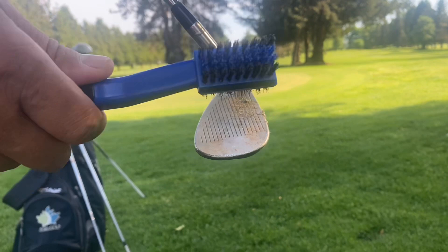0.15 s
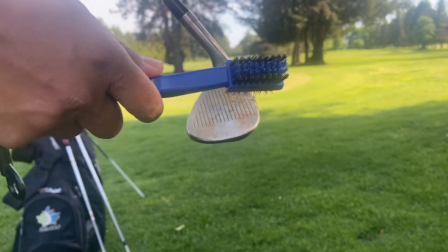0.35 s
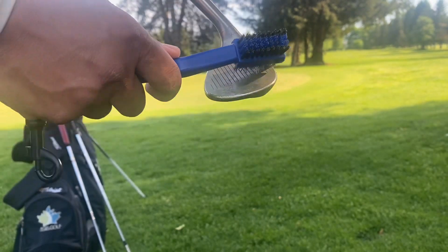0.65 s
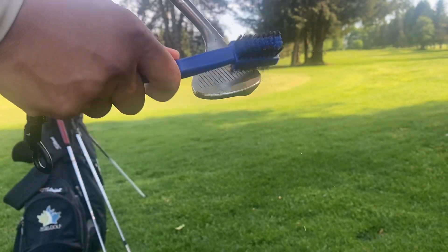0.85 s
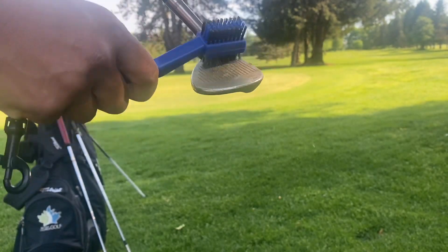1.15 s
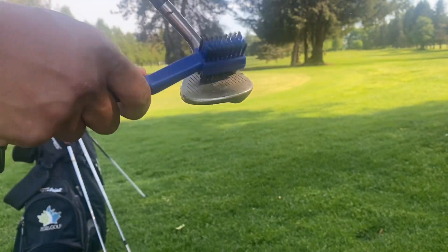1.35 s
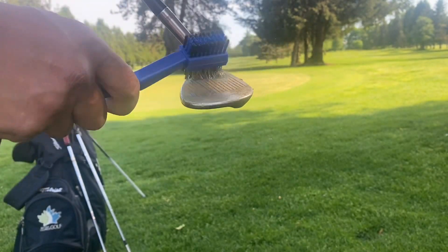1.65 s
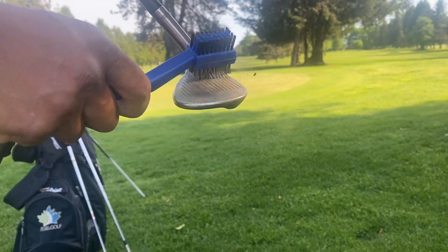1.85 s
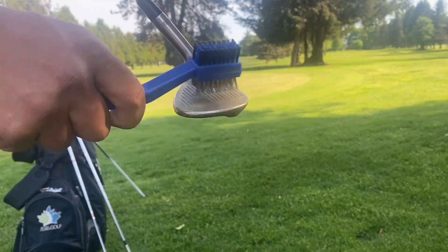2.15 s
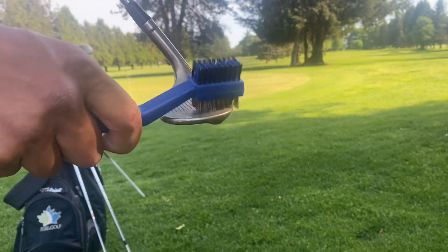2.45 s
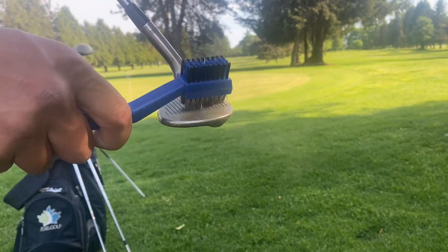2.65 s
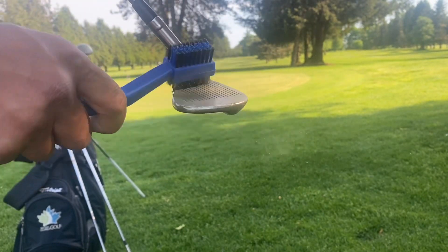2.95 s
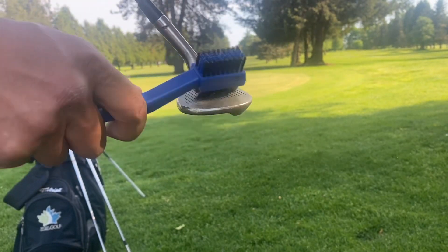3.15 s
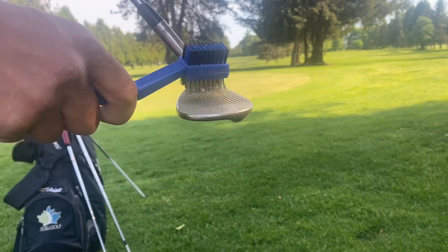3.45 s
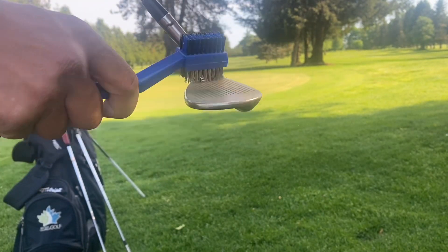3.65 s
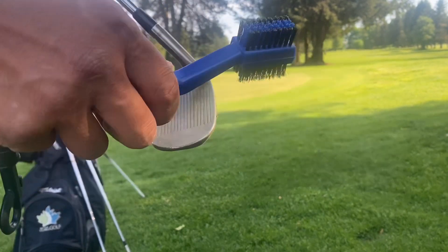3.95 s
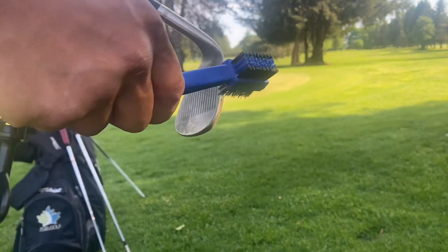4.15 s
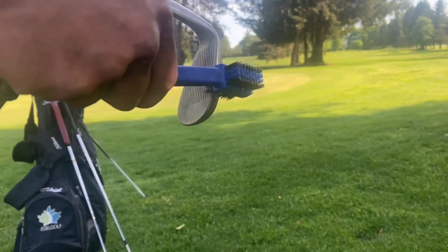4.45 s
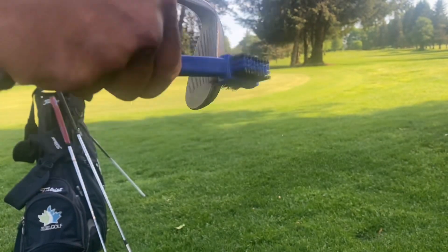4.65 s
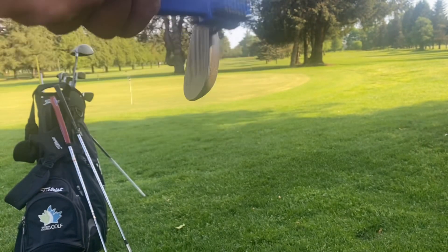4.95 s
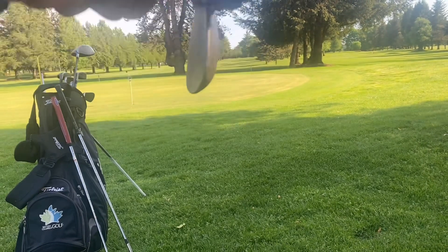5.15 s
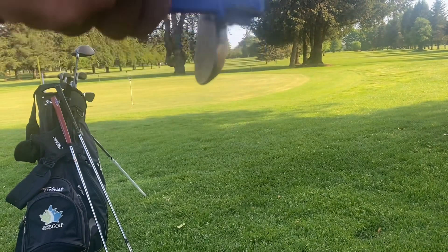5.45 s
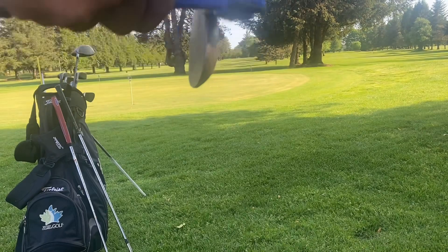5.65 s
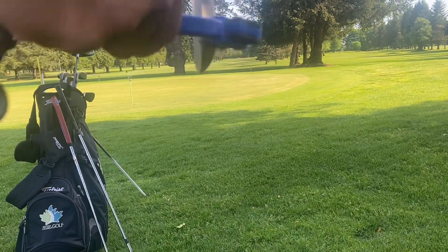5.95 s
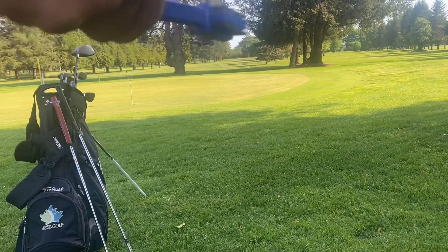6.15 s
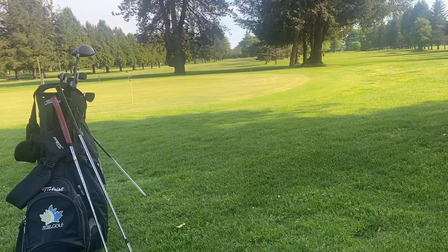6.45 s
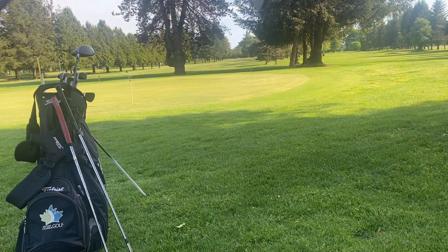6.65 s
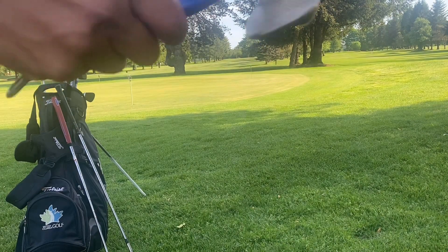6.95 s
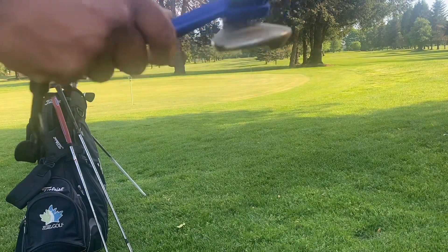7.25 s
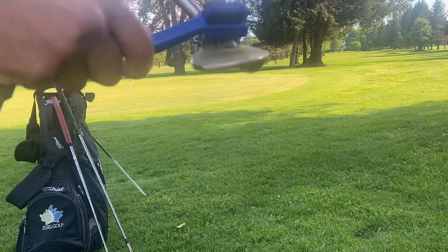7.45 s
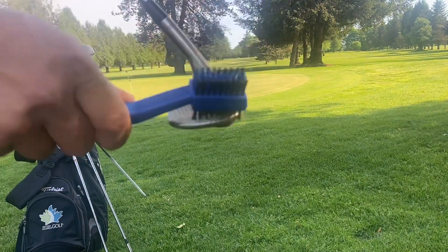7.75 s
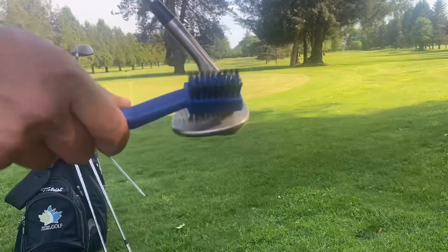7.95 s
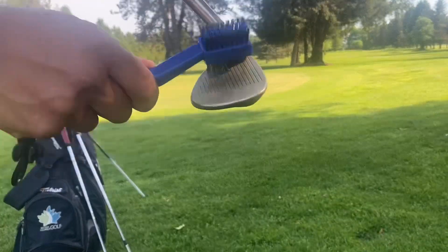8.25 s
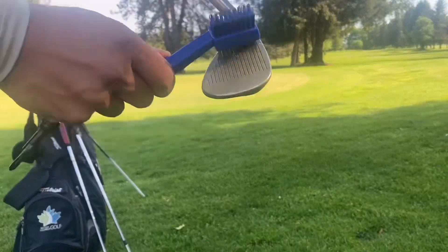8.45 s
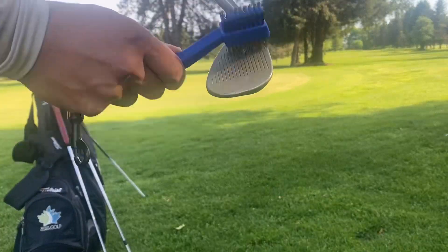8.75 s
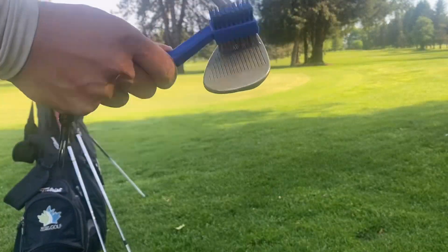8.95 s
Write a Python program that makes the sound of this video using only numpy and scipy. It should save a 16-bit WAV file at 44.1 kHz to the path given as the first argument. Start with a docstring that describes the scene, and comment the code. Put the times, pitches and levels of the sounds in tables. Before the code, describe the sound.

Very close, a stiff brush scrubs a grooved metal club face about ten strokes a second, raspy and hissy. It pauses briefly, resumes on another club with a slightly different colour, stops with a sharp plastic-on-metal knock, then after a light pass scrubs harder to the end. Outdoors on open grass, distant mowers rumble low and a bird whistles faintly early on. Near stereo microphone, dry, no echo.

```python
"""A stiff brush scrubs grooved golf clubs close by, about ten strokes a second: stick-slip clicks, coloured
by the club face and swelling with brush speed. Tufts flick off edges as short noise bursts; the plastic
head knocks on the metal, ringing damped modes; thin pings ring at single high pitches.
Far off, mowers rumble and drone (filtered noise, wavering sines) and a bird whistles gliding tones."""
import sys
import numpy as np
from scipy import signal
from scipy.fft import rfft, irfft, next_fast_len
from scipy.io import wavfile
from scipy.ndimage import uniform_filter1d

SR = 44100
rng = np.random.default_rng(int(sys.argv[2]) if len(sys.argv) > 2 else 0)


def unload_wav(signal):
    """Save mono or channel-first audio to the path in sys.argv[1] as 16-bit WAV at rate SR, clipped to [-1, 1]."""
    wavfile.write(
        sys.argv[1],
        SR,
        np.round(np.clip(np.atleast_2d(signal).T, -1, 1) * 32767).astype(np.int16),
    )


N = 400869
TIME = np.arange(N) / SR
SIZE = next_fast_len(N + 4096)
FREQS = np.maximum(np.arange(SIZE // 2 + 1) * SR / SIZE, 1)


def from_db(db):
    """Decibels to gain."""
    return 10 ** (np.asarray(db) / 20)


def rms_one(x):
    """Scale to unit power."""
    return x / np.sqrt(np.mean(x ** 2) + 1e-20)


def in_time(rows):
    """Each column of a curve, interpolated at every sample."""
    s, *columns = np.transpose(rows)
    return [np.interp(TIME, s, column) for column in columns]


def in_hz(points):
    """A table interpolated over log frequency at every bin."""
    hz, value = np.transpose(points)
    return np.interp(np.log(FREQS), np.log(hz), value)


def to_wave(spectrum):
    """Back from frequency to time."""
    return irfft(spectrum, SIZE)[..., :N]


def drift(rate_hz):
    """Random curve of rms 1 with a new target rate_hz times a second."""
    return rms_one(np.interp(TIME * rate_hz, np.arange(20000), rng.standard_normal(20000)))


def bandpass(x, low_hz, high_hz):
    """Butterworth band."""
    return signal.sosfilt(signal.butter(2, [low_hz, high_hz], "band", fs=SR, output="sos"), x)


def arch(start_s, length_s, power, skew=1):
    """The samples of one gesture, its progress 0-1, and its rise and fall."""
    first = max(round(start_s * SR), 0)
    last = min(round((start_s + length_s) * SR), N)
    span = np.arange(first, last)
    progress = np.clip((span / SR - start_s) / length_s, 0, 1)
    return span, progress, np.abs(np.sin(np.pi * progress ** skew)) ** power


def ring(force, hz, t60_s):
    """One damped mode: a unit click starts a decaying sine of initial height 1."""
    r = from_db(-60 / (t60_s * SR))
    w = 2 * np.pi * hz / SR
    return signal.lfilter([0, np.sin(w)], [1, -2 * r * np.cos(w), r * r], force)


RING_WANDER = .018  # rms share of the pitch


def sing(sound, curve, width_hz):
    """Adds a resonance that moves in pitch and strength: shift to 0 Hz, lowpass, shift back."""
    hz, strength_db = in_time(curve)
    hz = hz * (1 + RING_WANDER * drift(12))
    turn = np.exp(2j * np.pi * np.cumsum(hz) / SR)
    r = np.exp(-np.pi * width_hz / SR)
    baseband = signal.lfilter([1 - r], [1, -r], sound * turn.conj() + 1e-18)
    return sound + from_db(strength_db) * 2 * np.real(turn * baseband)


def pair(two, likeness):
    """Spectra of left and right, of given likeness, from two unrelated signals."""
    mid, side = rfft(two, SIZE)
    alike = np.clip(in_hz(likeness), -1, 1)
    return np.sqrt(1 + alike) * mid + np.sqrt(1 - alike) * side * [[1], [-1]]


# left over right port: (frequency [Hz], left minus right [dB])
PORT_BALANCE = [(300, 1.5), (1200, 2.5), (2500, 5.5), (3600, 4.5), (5000, 2.5), (6500, 1), (9000, 0),
                (15500, 0)]
# phase between the ports: (frequency [Hz], left lead [rad])
PORT_LEAD = [(6400, 0), (7300, -1.3), (8300, -3.0), (9600, -5.8), (10400, -6.3), (11800, -9.4),
             (12800, -9.8), (13200, -12), (14400, -12.6), (15400, -15.5)]


def at_ports(spectra):
    """A near source reaches the left microphone port louder, and its treble later."""
    gain = from_db(in_hz(PORT_BALANCE) * [[.5], [-.5]])
    return spectra * gain * np.exp(1j * in_hz(PORT_LEAD) * [[1], [0]])


# likeness of the ports for near noise: (frequency [Hz], likeness [0-1])
NEAR_LIKENESS = [(500, 0.24), (2400, 0.31), (4000, 0.65), (6500, 0.41), (8400, 0.95), (10000, 0.91),
                 (12000, 1), (13000, 0.73), (14000, 0.89), (15500, .88)]


def near_pair(two):
    """Port spectra of a near noise source."""
    return at_ports(pair(two, NEAR_LIKENESS))


# left-right likeness of far noise: (frequency [Hz], likeness [0-1])
FAR_LIKENESS = [(60, 1), (130, 0.93), (260, 0.66), (500, 0.033), (900, 0), (8000, 0.32)]


def background(colour):
    """Steady far noise of rms 1, most alike left and right in the bass."""
    noise = pair(rng.standard_normal((2, N)), FAR_LIKENESS)
    return rms_one(to_wave(noise * from_db(in_hz(colour))))


# spectrum of the open air: (frequency [Hz], relative density [dB per Hz])
AIR_SPECTRUM = [(30, -4.5), (100, 8.5), (200, 6), (280, -1.5), (400, -6), (700, -8), (1100, -11),
                (1600, -17.5), (2200, -21.5), (2900, -23.5), (3700, -33.5), (6000, -37), (9000, -55.5),
                (15500, -58.5)]


def open_air(level_db):
    """Steady broad noise, strongest in the bass."""
    return from_db(level_db) * background(AIR_SPECTRUM)


# distant machines draw nearer: (time [s], relative level [dB])
RUMBLE_LEVEL = [(0, -44.5), (1.8, -43), (3.2, -42), (6.5, -42), (9.09, -42.5)]
# spectrum of the rumble: (frequency [Hz], relative density [dB per Hz])
RUMBLE_SPECTRUM = [(18, -59), (27, -36), (36, -25.5), (50, -9), (66, 2.44), (85, 1.6), (100, -4.5),
                   (130, -4.5), (170, -16), (230, -20.5), (320, -36.5), (600, -75.5)]


def rumble(level_db):
    """Far machines as low noise, strongest near 70 Hz."""
    return from_db(in_time(RUMBLE_LEVEL)[0] + level_db) * background(RUMBLE_SPECTRUM)


def tone(hz, waver):
    """A far tone of rms 1, wavering in pitch and level as the air moves."""
    phase = 2 * np.pi * np.cumsum(hz * (1 + waver * drift(9))) / SR
    return rms_one(np.sin(phase) * (1 + .22 * drift(13)))


# deep drone of one mower: (time [s], relative level [dB])
DRONE_LEVEL = [(0, -58), (1.2, -56.5), (3.2, -41.5), (4.5, -47.5), (6.2, -40), (7.0, -47), (7.6, -39.5),
               (9.09, -55)]
DRONE_HZ = 66.25
# third engine, slowing and fading: (time [s], pitch [Hz], level [dB])
THIRD_ENGINE = [(0, 158.8, -54.5), (.5, 154.7, -50), (1.2, 117, -54.5), (2.6, 128.7, -53),
                (3.3, 125.7, -92)]
# second mower, sagging in speed: (time [s], fundamental [dB, relative], second harmonic [dB])
SECOND_MOWER = [(0, -59, -59), (1.6, -80, -63), (2.2, -58, -56), (5.6, -50, -57.5), (7.2, -56, -64.5),
                (8.3, -52, -54), (9.09, -52, -44.5)]
MOWER_HZ, MOWER_SAG_HZ_PER_S = 88.25, .43
# steady far hum, a little weaker later: (time [s], fundamental level [dB])
FAR_HUM = [(3, -64.5), (4, -70.5), (9.09, -69)]
HUM_HZ, HUM_OCTAVE_DB = 355.2, -12


def mowers(drone_db, mower_db, third_db):
    """Low engine orders carry across the grass as wavering sines."""
    out = from_db(in_time(DRONE_LEVEL)[0] + drone_db) * tone(DRONE_HZ, waver=0.0193)
    engine_hz, engine_db = in_time(THIRD_ENGINE)
    out += from_db(engine_db) * tone(engine_hz, waver=.06)
    hz = MOWER_HZ - MOWER_SAG_HZ_PER_S * TIME
    first_db, second_db = in_time(SECOND_MOWER)
    out += from_db(first_db + mower_db) * tone(hz, waver=.016)
    # third harmonic follows the second
    upper = tone(2 * hz, waver=0.0038) + from_db(third_db) * tone(3 * hz, waver=0.00485)
    out += from_db(second_db) * upper
    octave = from_db(HUM_OCTAVE_DB) * tone(2 * HUM_HZ, waver=0.0022)
    hum = tone(HUM_HZ, waver=0.0022) + octave
    return out + from_db(in_time(FAR_HUM)[0]) * hum


# whistles: (start [s], length [s], first pitch [Hz], last pitch [Hz], relative level [dB])
WHISTLES = [(0.659, .1, 1636, 1570, -73), (0.781, .23, 1877, 1830, -73), (1.129, .075, 1655, 1710, -70),
            (1.214, .075, 1700, 1622, -63.5), (1.291, 0.05, 1670, 1676, -67), (1.385, .09, 1688, 1634, -70),
            (1.635, 0.145, 1595, 1797, -68)]


def bird(level_db):
    """A few faint slurred whistles, fluttering on their way through the air."""
    hz = np.full(N, float(WHISTLES[0][2]))
    song = np.zeros(N)
    for start_s, length_s, first_hz, last_hz, note_db in WHISTLES:
        span, progress, swell = arch(start_s, length_s, power=0.4)
        hz[span] = first_hz + (last_hz - first_hz) * progress
        song[span] = from_db(note_db) * swell
    flutter = 1 + .45 * drift(60)
    return from_db(level_db) * song * flutter * tone(hz, waver=0.0055)


# from a stiff bristle or the brush clip: (time [s], pitch [Hz], relative peak [dB], t60 [s])
METAL_PINGS = [(3.8203, 13600, -26.5, 0.0074), (6.739, 9400, -59, 0.077), (6.769, 9500, -56.5, 0.047),
               (6.829, 9200, -57.5, 0.095), (7.062, 9400, -67, 0.072), (7.0894, 9460, -55, .06),
               (7.11, 9400, -66, 0.036)]


def pings(level_db):
    """Small steel parts are set ringing at one high pitch."""
    click = np.zeros(SR // 8)
    click[0] = 1
    out = np.zeros(N)
    for s, hz, peak_db, t60_s in METAL_PINGS:
        span = round(s * SR) + np.arange(len(click))
        out[span] += from_db(peak_db + level_db) * ring(click, hz, t60_s)
    return to_wave(at_ports(rfft(out, SIZE)))


# brush head on club: (time [s], relative blow [dB], lowest excited [Hz], highest excited [Hz],
# chatter against the blow [dB])
HEAD_KNOCKS = [(1.8814, -20, 700, 3900, -21), (1.899, -31.5, 700, 3200, -10),
               (3.8201, -20, 1740, 2920, -40), (4.955, -26, 400, 1400, -32), (5.345, -21, 300, 795, -19),
               (5.38, -19, 300, 700, -22), (6.1427, -2, 251, 14000, -30.5), (6.1464, -22, 1500, 6030, -29),
               (6.227, -36.5, 1000, 9000, -26), (6.467, -12.5, 150, 600, -31),
               (6.769, -32.5, 2000, 5380, -21), (7.3212, -22.5, 600, 3500, -22),
               (8.072, -29, 600, 2960, -24), (8.162, -18, 700, 1200, -22), (8.365, -30, 400, 2480, -23)]
# modes a knock rings: (frequency [Hz], relative level [dB], t60 [s])
CLUB_MODES = [(300, -33, 0.0094), (660, -15, 0.0066), (980, -15.5, 0.012), (1540, -9.5, 0.0054),
              (2100, -20, 0.0097), (2850, -5.5, 0.0058), (3200, -2.5, 0.0034), (3800, -7, 0.005),
              (4450, -16.5, 0.012), (5450, -7.5, 0.0031), (6500, -7.5, 0.0033), (7200, -6.5, 0.0029),
              (8480, -3.5, 0.0029), (9700, -1.5, 0.0011), (13620, -31, 0.0029)]
KNOCK_LAG_S = .00022  # left port late in lows and mids


def knocks(level_db, chatter_t60_s, left_db):
    """Plastic meets hand-damped metal: blow and chatter, banded by the contact, ring the same modes."""
    age = np.arange(SR // 20) / SR
    force = np.zeros(N) + 1e-18
    for s, peak_db, low_hz, high_hz, chatter_db in HEAD_KNOCKS:
        chatter = from_db(chatter_db - 60 * age / chatter_t60_s) * rng.standard_normal(len(age))
        blow = (age == 0) + chatter
        force[round(s * SR) + np.arange(len(age))] += from_db(peak_db) * bandpass(blow, low_hz, high_hz)
    out = 0
    for k, (hz, mode_db, t60_s) in enumerate(CLUB_MODES):
        out = out + (-1) ** k * from_db(mode_db) * ring(force, hz, t60_s)
    # the lag stops at one full cycle
    late = np.exp(-2j * np.pi * np.minimum(FREQS * KNOCK_LAG_S, 1) * [[1], [0]])
    ports = to_wave(at_ports(rfft(out, SIZE)) * late)
    return from_db(level_db + left_db * np.array([[.5], [-.5]])) * ports


def split(sound):
    """The rasp under 7 kHz and the hiss above it, rms 1 each."""
    low = 1 / (1 + (FREQS / 7000) ** 16)
    return rms_one(to_wave(sound * low)), rms_one(to_wave(sound * (1 - low)))


# spectrum of a flick before the split: (frequency [Hz], relative density [dB per Hz])
FLICK_SPECTRUM = [(1200, -9.5), (2800, -4), (4100, 0.5), (5500, 1.5), (7200, 0), (8600, 5), (11000, -2.5),
                  (13000, -11), (15700, -3)]
# tufts off an edge: (time [s], relative level [dB], relative rasp against hiss [dB], swell [s])
TUFT_FLICKS = [(0.04, -58, 11.5, 0.00091), (0.316, -77, -9, 0.0027), (0.416, -80, -15, .0013),
               (0.474, -56.5, 3.5, 0.0022), (0.528, -57, -15, 0.0012), (0.597, -49, -7, 0.0012),
               (0.641, -56, 14.5, 0.0023), (0.752, -45, -9, 0.0012), (0.901, -51, 6, 0.0019),
               (0.943, -38.5, -19, 0.0016), (1.197, -40, -5, .0013), (1.258, -43, -15, .0013),
               (1.432, -44.5, 5, 0.0059), (1.498, -41, -11, .0013), (1.709, -32.5, -10, 0.0018),
               (1.7803, -34.5, -3.5, 0.0013), (1.959, -38.5, -4, 0.0044), (1.994, -41, -13, 0.0014),
               (2.316, -37, -4, .004), (2.395, -39, -18, 0.0015), (2.496, -42, 1, 0.0034),
               (2.523, -38, -18, .001), (2.538, -32.5, -8, 0.00099), (2.677, -40, -1, 0.001),
               (2.687, -38, -4, .0009), (2.851, -44, 3, 0.003), (2.9, -38.5, -2, 0.0019),
               (3.215, -43.5, 7.5, 0.0038), (3.264, -39, -7, 0.0016), (3.42, -41, -5, .0015),
               (3.595, -36, -1.5, 0.0048), (3.734, -45, 5, 0.0044), (3.8201, -43, -13, 0.0006),
               (3.887, -64, 17, .001), (3.9122, -59, 12.5, 0.0012), (4.25, -41.5, -1, 0.0018),
               (4.357, -51.5, 11, .0015), (4.7623, -39, -8, .0013), (4.839, -38, -4, 0.0021),
               (5.0968, -34.5, -9, 0.00077), (5.171, -41, 1.5, 0.0028), (5.346, -37, -15, .0013),
               (5.512, -37.5, -18, .001), (6.075, -37.5, -5, 0.0075), (6.197, -29, -10.5, 0.0015),
               (6.466, -36.5, -4.5, 0.0025), (6.486, -40.5, -7, 0.0011), (6.527, -43, -11, .002),
               (6.621, -50.5, 1.5, 0.0042), (6.651, -58.5, -8, 0.0011), (7.036, -57.5, 0.5, 0.0011),
               (7.0894, -41.5, -11, 0.0012), (7.147, -45, -0.5, 0.0018), (7.39, -42.5, 2.5, 0.0015),
               (7.412, -41, -4, .0013), (7.5748, -38, -3, 0.0015), (7.589, -35, -7, 0.0022),
               (7.766, -43.5, 7, 0.0026), (7.778, -44, 4, 0.0022), (7.985, -40, 2, 0.004),
               (8.0698, -36, -12, 0.0021), (8.167, -38, -1, .0013), (8.241, -42, -6, 0.0018),
               (8.354, -36, -2.5, 0.0062), (8.427, -44, -1, .0013), (8.56, -41.5, 1.5, 0.0018)]


def flicks(level_db, rasp_db):
    """A whole tuft catches, then springs free within a few milliseconds."""
    noise = near_pair(rng.standard_normal((2, N)))
    rasp, hiss = split(noise * from_db(in_hz(FLICK_SPECTRUM)))
    age = np.arange(SR // 20) / SR
    out = np.zeros((2, N))
    for s, peak_db, bite_db, swell_s in TUFT_FLICKS:
        span = round(s * SR) + np.arange(len(age))
        burst = age / swell_s * np.exp(1 - age / swell_s)
        tuft = hiss[:, span] + from_db(bite_db + rasp_db) * rasp[:, span]
        out[:, span] += from_db(peak_db + level_db) * burst * tuft
    return out


def grip(uneven_db, per_s):
    """The pressure of the hand is never quite even."""
    return from_db(uneven_db * drift(per_s))


# spectrum of a light touch before the split: (frequency [Hz], relative density [dB per Hz])
LIGHT_TOUCH = [(800, -12), (2000, -9.5), (3200, -8), (4300, -7), (6500, -5.5), (8400, -2.5), (9800, 0),
               (12000, -4), (14500, -6.5), (15700, -0.5)]
# bristles resting lightly on the metal: (start [s], length [s], relative level [dB])
LIGHT_GRAZES = [(0.0, 0.13, -77.5), (0.147, 0.19, -82.5), (0.305, 0.37, -77), (3.75, 0.11, -72.5),
                (3.831, 0.13, -64.5), (6.142, 0.12, -61.5), (6.209, 0.11, -78), (6.659, .26, -70),
                (7.017, 0.14, -79.5), (7.11, 0.028, -78)]
GRAZE_ATTACK_S, GRAZE_RELEASE_S = 0.013, 0.066


def grazes(bristles, rasp_db, hiss_db):
    """With little pressure only a few bristles crackle."""
    touch = np.zeros(N)
    for start_s, length_s, level_db in LIGHT_GRAZES:
        rise = (TIME - start_s) / GRAZE_ATTACK_S
        fall = (start_s + length_s - TIME) / GRAZE_RELEASE_S
        touch += from_db(level_db) * np.clip(np.minimum(rise, fall), 0, 1)
    rasp, hiss = split(bristles * from_db(in_hz(LIGHT_TOUCH)))
    crackle = from_db(rasp_db) * rasp + from_db(hiss_db) * hiss
    return grip(uneven_db=1.0, per_s=56) * touch * crackle


# moving low resonance under the scrubbing: (time [s], resonance [Hz], strength [dB])
LOW_RESONANCE = [(.6, 690, -5), (1.8, 720, 6), (2.3, 980, -1), (2.8, 1000, 4), (3.3, 900, -6),
                 (7.2, 760, -4), (8.15, 920, 6), (9.09, 800, -10)]
LOW_WIDTH_HZ, JUDDER_LUMP_DB = 110, 4


def low_judder(low_hz, high_hz):
    """Lumpy low noise under the scrubbing, with a moving resonance between 690 and 1000 Hz."""
    body = bandpass(rng.standard_normal((2, N)), low_hz, high_hz)
    lumps = from_db(JUDDER_LUMP_DB * np.minimum(drift(140), 2))
    judder = rms_one(sing(body * lumps, LOW_RESONANCE, LOW_WIDTH_HZ))
    return judder * from_db([[1.5], [-1.5]])


def slips(per_s, spread_db):
    """Bristle tips catch and let go: random clicks of uneven size."""
    sizes = from_db(spread_db * np.minimum(rng.exponential(1, (2, N)), 4))
    return (rng.random((2, N)) < per_s / SR) * sizes * rng.standard_normal((2, N))


def vary_bands(sound, depth_db):
    """Random slow gains make the scratch's narrow bands rise and fall."""
    cells = signal.stft(sound, nperseg=512)[2]
    chance = rng.standard_normal(cells.shape[1:])
    for axis in (0, 0, 1, 1):  # smooth twice over frequency, twice over time
        chance = uniform_filter1d(chance, size=3 + 2 * axis, axis=axis)
    return signal.istft(cells * from_db(depth_db * rms_one(chance)), nperseg=512)[1][:, :N]


SNAPS_PER_S, SNAP_DB = 600, -10  # level against the friction


def scratch(clump_db, groove_per_s):
    """Slips bunch as tufts cross the grooves and single bristles snap out; gives the port spectra."""
    clumps = from_db(clump_db * drift(groove_per_s) + 0.89 * drift(110))
    friction = rms_one(vary_bands(slips(per_s=22000, spread_db=1.5) * clumps, depth_db=3.3))
    snaps = rms_one(slips(per_s=SNAPS_PER_S, spread_db=1.8))
    return near_pair(friction + from_db(SNAP_DB) * snaps)


# to and fro: (start [s], length [s], relative hiss level [dB], relative rasp against hiss [dB],
# skew [above 1: fastest moment late])
BRUSH_STROKES = [(0.632, 0.098, -53, -2.5, 0.54), (0.723, 0.095, -52.5, -5, 1.7),
                 (0.83, 0.089, -50, -5.0, 1.04), (0.913, 0.1, -52, -3, 2.26),
                 (1.013, 0.1, -50.5, -5.5, 1.8), (1.1, 0.12, -51.5, -5.5, 1.33),
                 (1.198, 0.099, -50.5, -6, 1.8), (1.285, 0.11, -51, -5, 1.6),
                 (1.402, 0.085, -48, -5.5, 1.2), (1.475, 0.096, -50.5, -4.5, 1.7),
                 (1.567, 0.092, -50, -3, 1.6), (1.655, 0.11, -48.5, -6.5, 1.45),
                 (1.756, 0.087, -48, -6, 0.99), (1.845, 0.099, -51, -3.5, 1),
                 (1.941, 0.072, -49.5, -7, 1.1), (1.987, 0.13, -47, -6.5, 2.3),
                 (2.108, 0.098, -49.5, -5.5, 1.07), (2.193, 0.1, -47.5, -6.5, 1.3),
                 (2.278, 0.1, -50.5, -3.5, 1.26), (2.381, 0.098, -46.5, -6.5, 0.99),
                 (2.47, 0.098, -49.5, -3.5, 0.7), (2.549, 0.1, -48, -7, 1.4),
                 (2.637, 0.11, -51, -2.5, 1.55), (2.731, 0.11, -47.5, -5.5, 1.17),
                 (2.832, 0.11, -51, -2, 0.67), (2.921, 0.093, -51, -3.5, 1.7), (3.006, 0.09, -52, -4, 1.4),
                 (3.103, 0.12, -50.5, -4.5, 0.93), (3.204, 0.087, -47, -4.5, 0.46),
                 (3.283, 0.098, -49.5, -4.5, 1.55), (3.372, 0.1, -48.5, -4.5, 2.1),
                 (3.468, 0.11, -48.0, -7, 1.1), (3.567, 0.086, -48.5, -5.0, 1.16),
                 (3.617, 0.14, -42.5, -11, 3.2), (4.253, 0.11, -54.5, -4.5, 0.9),
                 (4.36, 0.15, -52, -2, 0.47), (4.464, 0.11, -51, -9.5, 1.4),
                 (4.569, 0.092, -47.5, -6.5, 1.46), (4.641, 0.13, -48.5, -4.5, 2.36),
                 (4.775, 0.13, -52.5, -2.5, 1.04), (4.869, 0.11, -50, -6, 1.5),
                 (4.975, 0.108, -49, -7.5, 1.25), (5.077, 0.11, -45.5, -7, 1.26),
                 (5.183, 0.15, -51.5, -4.5, 0.95), (5.322, 0.093, -50, -5, 0.86),
                 (5.416, 0.096, -51, -4.5, 0.61), (5.503, 0.12, -52, -0.5, 1), (5.596, 0.13, -51, -1, 1.9),
                 (5.722, 0.11, -50.5, -6, 0.82), (5.827, 0.097, -45, -8, 1.6), (5.925, 0.12, -49, -6, 0.43),
                 (6.037, 0.093, -49, -5.5, 0.54), (6.476, 0.09, -49, -10, 0.98),
                 (6.547, 0.096, -53.5, -9, 1.2), (7.16, 0.11, -50, -2.5, 1.03),
                 (7.266, 0.11, -50.5, -4.5, 1.75), (7.377, 0.089, -50, -5, 0.93),
                 (7.461, 0.095, -46.5, -9, 1.2), (7.558, 0.092, -43.5, -5.5, 1.2),
                 (7.643, 0.11, -45.5, -8.5, 1.46), (7.75, 0.12, -49, -5, 0.89),
                 (7.867, 0.089, -47, -6.5, 0.65), (7.957, 0.087, -47.5, -3.5, 0.63),
                 (8.053, 0.076, -49, -4.5, 1.1), (8.122, 0.098, -48.5, -3.5, 1.6),
                 (8.229, 0.096, -47.5, -6, 1.36), (8.312, 0.1, -49.5, -2, 2.1),
                 (8.419, 0.1, -48.5, -5, 1.2), (8.514, 0.081, -49, -4.5, 1.76),
                 (8.599, 0.11, -46.0, -8, 1.14), (8.689, 0.099, -48.5, -4, 1.85),
                 (8.795, 0.1, -46, -6, 1.13), (8.896, 0.089, -51, -4.0, 0.89),
                 (8.985, 0.11, -46.5, -5, 0.7)]
SPEED_POWER = 0.6  # loudness as a power of brush speed
FLEX_S = .011  # bristles bend before sliding, rounding each stroke
TURN_DB, TURN_S = -20.5, 0.087  # crackle through each turn, under the nearby strokes


def sweeps(bout):
    """Levels of hiss and rasp: each stroke swells and dies with the speed of the brush."""
    levels = np.zeros((2, N))
    for start_s, length_s, hiss_db, bite_db, skew in BRUSH_STROKES:
        if bout[0] <= start_s < bout[1]:
            span, _, swell = arch(start_s, length_s, SPEED_POWER, skew)
            stroke = np.outer(from_db([hiss_db, hiss_db + bite_db]), swell)
            levels[:, span] = np.hypot(levels[:, span], stroke)
    levels = uniform_filter1d(levels, size=round(FLEX_S * SR))
    turns = from_db(TURN_DB) * uniform_filter1d(levels, size=round(TURN_S * SR))
    return np.hypot(levels, turns)


def scrub(bristles, judder, bout, face, hiss_db, rasp_db, judder_db):
    """Bristles rasp and hiss over the grooves, with a low judder beneath."""
    sweep, bite = sweeps(bout)
    rasp, hiss = split(bristles * from_db(in_hz(face)))
    low = rasp + from_db(judder_db) * judder
    return from_db(hiss_db) * sweep * hiss + from_db(rasp_db) * bite * low


# bristle spectra before the split: (frequency [Hz], relative density [dB per Hz])
WEDGE = [(250, 2), (800, -20.5), (2000, -12.5), (3100, -7.5), (3700, -9.5), (4800, -7.5), (5700, -8.5),
         (6500, -7), (7700, -4), (8450, 2.5), (9600, 0), (11000, -2), (13000, -7.5), (15700, -6)]
IRON = [(250, -3.5), (800, -7), (2100, -15.5), (2500, -8.5), (2900, -13), (3400, -7.5), (4000, -6),
        (4800, -8.5), (5500, -7), (6000, -8), (6900, -9), (7500, -4.5), (8600, -4), (10000, 2), (11200, -6),
        (12900, -9), (14500, -10), (15700, -8.5)]
WEDGE_HARDER = [(250, 1), (800, -21.5), (2000, -13), (3100, -10), (3700, -9.5), (4800, -6), (5700, -6.5),
                (6500, -4.5), (7700, -2), (8450, 1.5), (9600, 0), (11000, -2.5), (13000, -8), (15700, -6.5)]
IRON_FROM_S, IRON_TO_S, WEDGE_FROM_S = 4.2, 6.3, 7.0


def bouts(bristles):
    """Wedge, iron, one light pass, then the wedge again, pressed harder."""
    judder = low_judder(low_hz=376, high_hz=1200)
    out = scrub(bristles, judder, (0, IRON_FROM_S), WEDGE, hiss_db=1.4, rasp_db=0.5, judder_db=-10.5)
    out += scrub(bristles, judder, (IRON_FROM_S, IRON_TO_S), IRON,
                 hiss_db=2.04, rasp_db=1.0, judder_db=-14.5)
    out += scrub(bristles, judder, (IRON_TO_S, WEDGE_FROM_S), LIGHT_TOUCH,
                 hiss_db=3.0, rasp_db=1.0, judder_db=-8)
    out += scrub(bristles, judder, (WEDGE_FROM_S, np.inf), WEDGE_HARDER,
                 hiss_db=0.55, rasp_db=1.2, judder_db=-11.5)
    return out * grip(uneven_db=0.86, per_s=78)


# bristle resonance, moving with tilt and pressure: (time [s], resonance [Hz], strength [dB])
BRISTLE_RESONANCE = [(0, 4250, 2), (.48, 4540, 7), (.65, 4200, 1), (1.1, 4180, -2), (1.6, 3980, 1.5),
                     (2.2, 4044, 3.5), (2.6, 3860, 0), (3.6, 4150, 6), (3.745, 3550, 8.5),
                     (3.79, 3550, -14), (4.25, 3550, 0), (4.55, 3500, 2.5), (5.0, 3860, 0.5),
                     (6.1, 3910, -11.5), (6.46, 4220, 6.5), (6.63, 4450, 12.5), (6.8, 4300, -34),
                     (7.6, 4180, -1), (8.55, 4180, 1.5), (9.09, 3980, 3)]
BRISTLE_WIDTH_HZ = 223


def brush():
    """Strokes, grazes and flicks share one moving bristle resonance."""
    bristles = scratch(clump_db=0.86, groove_per_s=970)
    contact = bouts(bristles)
    contact += grazes(bristles, rasp_db=-3.0, hiss_db=1.0)
    contact += flicks(level_db=-3.0, rasp_db=-6.0)
    return sing(contact, BRISTLE_RESONANCE, BRISTLE_WIDTH_HZ)


def scene():
    """Three bouts of scrubbing and one light pass in front of the open course."""
    engines = rumble(level_db=-0.5) + mowers(drone_db=0.0, mower_db=7.5, third_db=-11.5)
    course = engines * from_db([[-.4], [.4]]) + open_air(level_db=-54.5) + bird(level_db=-2.0)
    head = knocks(level_db=-5.5, chatter_t60_s=0.03, left_db=4.0) + pings(level_db=-1.5)
    return course + head + brush()


CUTOFF_HZ = 15850


def record(dry):
    """The top is cut steeply."""
    return to_wave(rfft(dry, SIZE) / (1 + (FREQS / CUTOFF_HZ) ** 200))


dry = scene()
out = record(dry)
unload_wav(out)
```